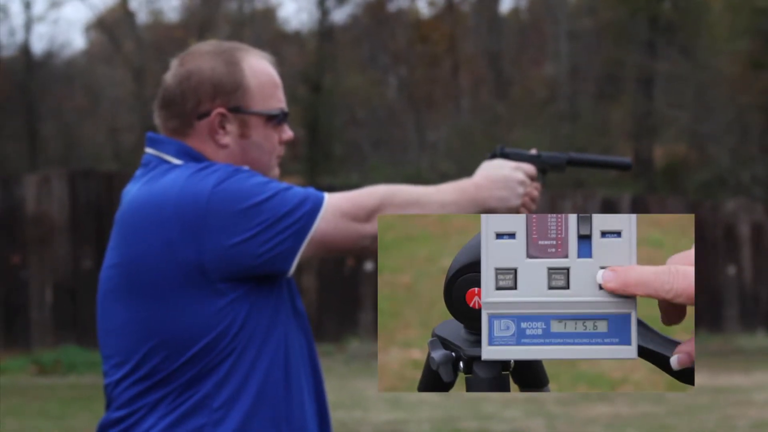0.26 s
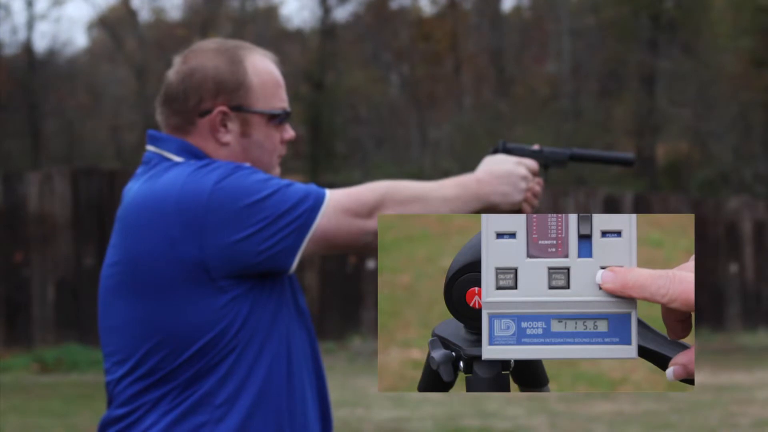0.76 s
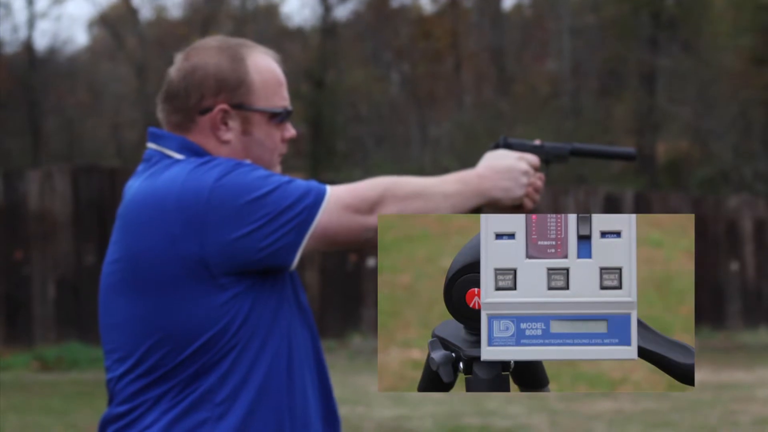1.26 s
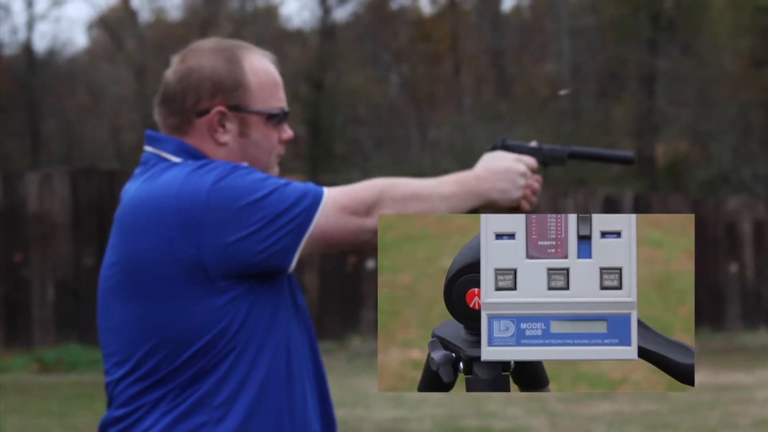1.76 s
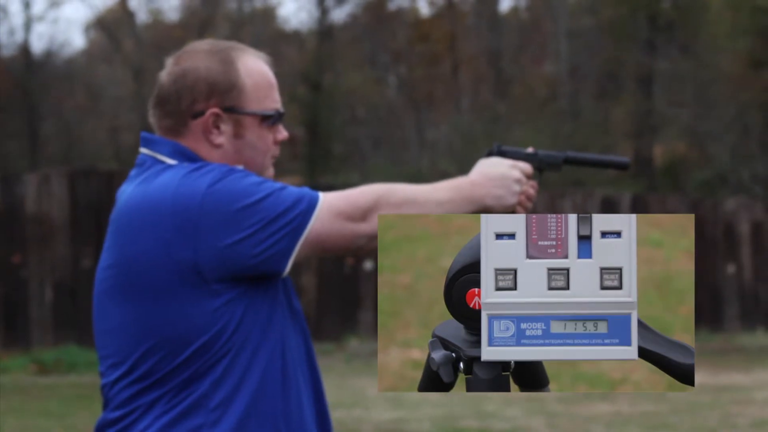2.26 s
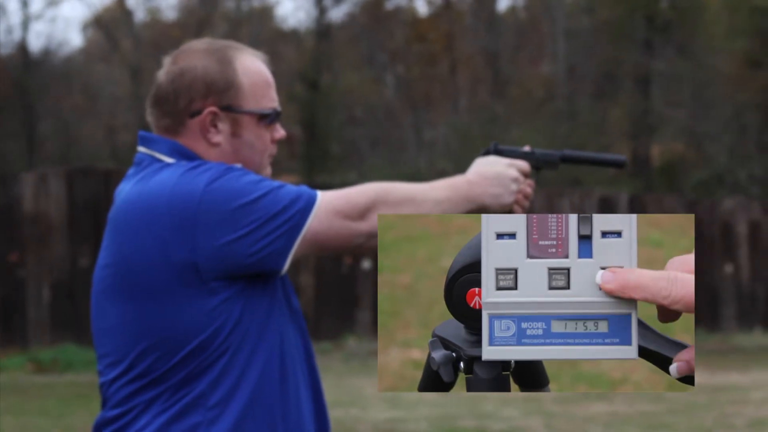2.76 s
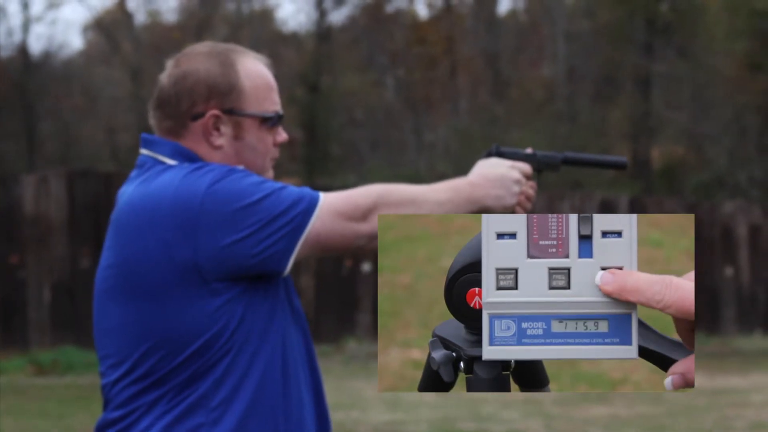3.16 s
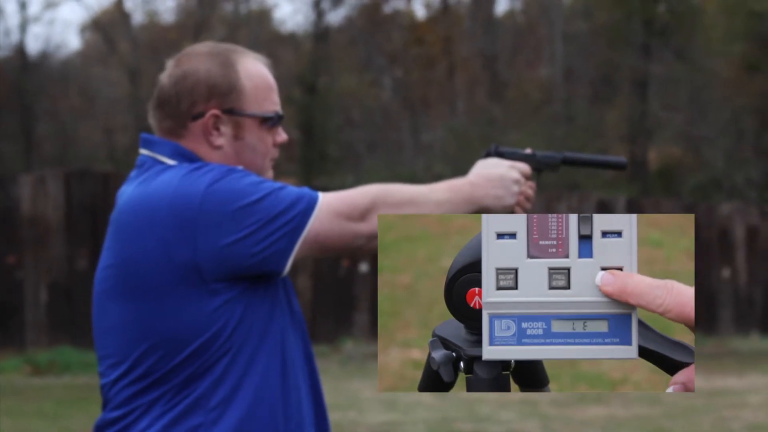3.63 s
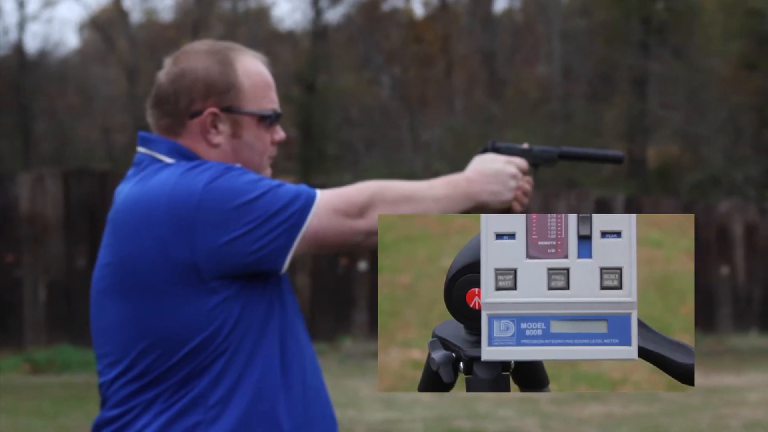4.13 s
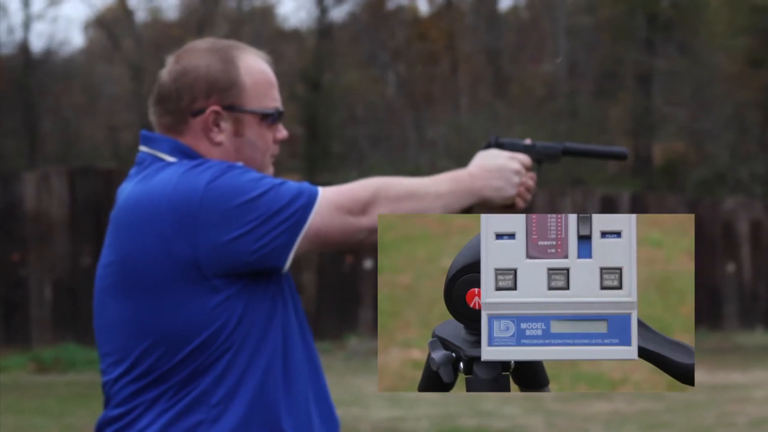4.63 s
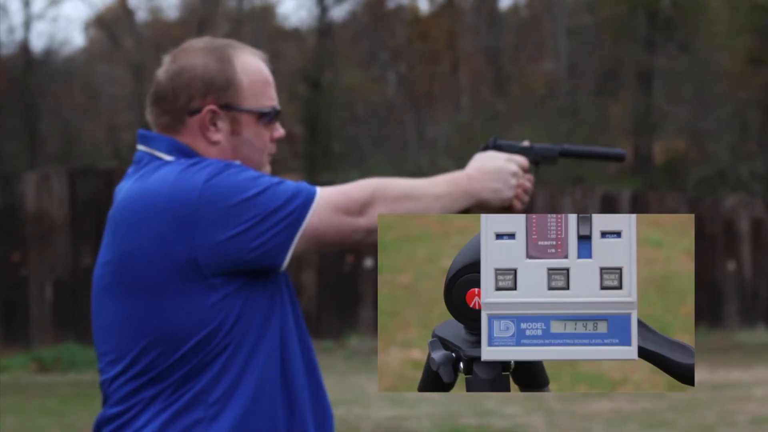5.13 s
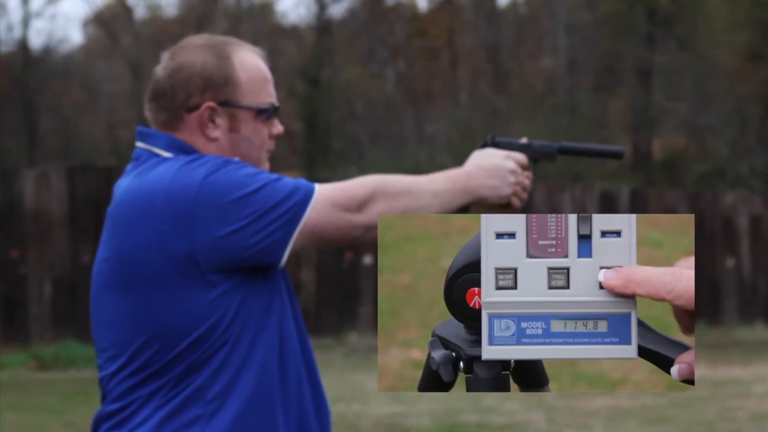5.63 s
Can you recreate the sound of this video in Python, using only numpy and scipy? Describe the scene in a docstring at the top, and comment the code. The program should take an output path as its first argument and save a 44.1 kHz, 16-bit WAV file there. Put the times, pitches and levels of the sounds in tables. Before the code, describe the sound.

Wind buffets a microphone outdoors as two suppressed pistol shots crack about three seconds apart, each with a bolt clack and woodland echoes.

```python
"""Suppressed pistol on an outdoor range

Two small-calibre shots, close enough to overload the microphone: hammer tick, spit of gas, slap of the bolt.
Delayed noise bursts are the echoes of fence and trunks and the bullet's thud; a diffuse tail is the woods.
A strength curve and listed gusts, with quick random lumps, drive the wind's rumble and flutter, over steady
hiss and a far sough. Trigger and meter button are short clicks; a far bird whistles a slightly wavering sine."""
import sys
import numpy as np
from scipy import signal
from scipy.fft import rfft, irfft
from scipy.io import wavfile
from scipy.ndimage import uniform_filter1d

SR = 44100
rng = np.random.default_rng(int(sys.argv[2]) if len(sys.argv) > 2 else 0)


def wrap_up_sound(samples):
    """Save the sound to the file named by the first command line argument, as 16-bit audio."""
    columns = np.atleast_2d(samples).T
    # keep every value between -1 and 1, then stretch to whole-number steps
    tamed = np.clip(columns, -1, 1)
    steps = np.round(tamed * 32767).astype(np.int16)
    wavfile.write(sys.argv[1], SR, steps)


N = 259749
TIME = np.arange(N) / SR
# Every *_COLOUR table is a relative noise spectrum: f/Hz, level per Hz/dB.


def amp(db):
    """Level: converts decibels to an amplitude ratio."""
    return 10 ** (np.asarray(db) / 20)


def evened(x):
    """Normalisation: scales a signal to rms 1."""
    return x / np.sqrt(np.mean(x ** 2) + 1e-20)


def read(points, hz):
    """Interpolation: reads a table linearly on a log-frequency axis."""
    f, value = np.transpose(points)
    return np.interp(np.log(hz + 1), np.log(f + 1), value)


def add(mix, s, sound):
    """Superposition: adds a sound to the mix at s seconds."""
    part = mix[round(s * SR):][:len(sound)]
    part += sound[:len(part)]


def smooth_noise(count, size):
    """Random modulation: white noise averaged twice over size steps, a smooth curve of rms 1."""
    once = uniform_filter1d(rng.standard_normal(count), size)
    return evened(uniform_filter1d(once, size))


def swell(at, width):
    """Gaussian envelope: a bell of height 1 around a moment."""
    return np.exp(-((TIME - at) / width) ** 2)


def noise(colour, size, tilt_db=0):
    """Spectral shaping: white noise filtered to a colour, tilted by dB per kHz, at rms 1."""
    hz = np.fft.rfftfreq(size, 1 / SR)
    gain = amp(read(colour, hz) + tilt_db * hz / 1000)
    return evened(irfft(rfft(rng.standard_normal(size)) * gain, size))


def steadied(x, size):
    """Envelope flattening: divides noise by its running rms over size samples."""
    return x / np.sqrt(uniform_filter1d(x ** 2, size) + 1e-12)


def burst(colour, decay, tilt_db=0, hold=0, rise=0):
    """Transient: coloured noise rises, holds, then decays exponentially; rise is a share of the decay."""
    t = np.arange(SR // 4) / SR
    onset = 1 - np.exp(-t / (0.00049 + rise * decay))
    fall = np.exp(-np.maximum(t - hold, 0) / decay)
    return steadied(noise(colour, size=len(t), tilt_db=tilt_db), size=200) * onset * fall


def snaps(rows, colour, hold, rise=0):
    """Superposition: plays a table of noise bursts that share one colour."""
    out = np.zeros(N)
    for s, db, tilt_db, decay in rows:
        add(out, s, amp(db) * burst(colour, decay, tilt_db, hold, rise))
    return out


def resonance(x, hz, width):
    """Resonance: a band-pass of the given width in Hz, with peak gain 1."""
    return signal.lfilter(*signal.iirpeak(hz, hz / width, SR), x)


# strength of the wind on the microphone: t/s, level/dB
WIND_STRENGTH = [(0.0, -16), (0.2, -7.5), (0.47, -8), (0.73, -15), (0.8, -24.5), (0.92, -9), (1.3, -11.5),
                 (1.58, -35.5), (1.84, -34), (1.92, -20.5), (2.4, -20.5), (3.0, -25.5), (3.45, -36.5),
                 (4.15, -34), (4.9, -13), (5.34, -22.5), (5.66, -18), (5.89, -28)]
# gusts that stand out of it: t/s, swell/dB, half-width/s
GUSTS = [(0.057, 5, 0.02), (0.17, 5.3, 0.019), (0.36, 3.5, 0.05), (0.7, 10, 0.033), (1.07, 3.5, 0.021),
         (1.225, 4, 0.019), (2.31, 6.1, 0.033), (2.93, 6, 0.028), (4.39, 8.5, 0.032), (4.616, 15, 0.017),
         (4.8, 4.5, 0.02)]
# deep and higher band of the wind noise: f/Hz, level per Hz/dB
RUMBLE_COLOUR = [(10, -14.5), (22, 6), (36, 2), (55, -3), (80, -6), (110, -19), (150, -28), (300, -84.5)]
FLUTTER_COLOUR = [(50, -40), (95, 0), (125, 0), (170, -8.5), (240, -18), (350, -29), (550, -44.5),
                  (1000, -64), (3000, -76)]
RUMBLE_DB, FLUTTER_DB = -2.5, -9.5  # levels at wind strength 0 dB
FLUTTER_GROWTH = 1.357  # dB of flutter per dB of wind strength
WIND_CEILING = 0.9  # largest amplitude of rumble and flutter together


def wind(lumps_db=2.5, rumble_lumps_db=1.56, flutter_lumps_db=2.0):
    """Turbulent pressure: eddies give a rumble and a flutter that grows faster with the wind; both saturate."""
    gusts_db = sum(db * swell(s, width) for s, db, width in GUSTS)
    strength_db = np.interp(TIME, *np.transpose(WIND_STRENGTH)) + gusts_db
    strength_db = strength_db + lumps_db * smooth_noise(N, size=1000)
    rumble_db = RUMBLE_DB + strength_db + rumble_lumps_db * smooth_noise(N, size=1800)
    flutter_lumps = np.tanh(smooth_noise(N, size=700))
    flutter_db = FLUTTER_DB + FLUTTER_GROWTH * strength_db + flutter_lumps_db * flutter_lumps
    rumble = amp(rumble_db) * steadied(noise(RUMBLE_COLOUR, size=N), size=5000)
    flutter = amp(flutter_db) * steadied(noise(FLUTTER_COLOUR, size=N), size=4000)
    push = WIND_CEILING * np.tanh((rumble + flutter) / WIND_CEILING)
    return push * signal.windows.tukey(N, 0.004)  # brief fade at both ends


# steady outdoor hiss: f/Hz, level per Hz/dB
AIR_COLOUR = [(60, 3.5), (200, -4), (400, 0), (580, -3.5), (800, -1), (1200, -5.5), (2200, -6.5),
              (3450, -8), (5200, -12), (6600, -19.5), (9000, -22.5), (15500, -25)]
AIR_DB = -48


def open_air():
    """Stationary noise: the outdoor hiss keeps one spectrum and level."""
    return amp(AIR_DB) * noise(AIR_COLOUR, size=N)


# sharp buffets of wind: t/s, level/dB, treble tilt/(dB per kHz), decay/s
BUFFETS = [(.155, -12, -0.5, 0.025), (.368, -14.5, 1.5, 0.013), (0.444, -14.5, -22, 0.017),
           (0.686, -10.5, -16, 0.015), (1.215, -17, -10, 0.0052)]
# their spectrum: f/Hz, level per Hz/dB
BUFFET_COLOUR = [(40, -0.5), (90, 0), (170, -3), (260, -11.5), (380, -32.5), (520, -32), (800, -38.5),
                 (1300, -44), (3000, -70), (8000, -90)]


def buffets():
    """Pressure transients: sharp buffets of wind are low bursts with a softened onset."""
    return snaps(BUFFETS, BUFFET_COLOUR, hold=0.0058, rise=0.33)


# the meter's reset button: t/s, level/dB, snap's treble tilt/(dB per kHz), knock's decay/s
BUTTON = [(.366, -25, 0.7, 0.00057), (3.0543, -28.5, 1, 0.0035), (5.8245, -31.5, 0.3, 0.0034)]
# its spectrum: f/Hz, level per Hz/dB
BUTTON_COLOUR = [(400, -8.5), (2200, -15), (2950, 3), (4100, -13.5), (6200, -13), (7800, -27), (10000, -16),
                 (13000, -14), (15000, -14), (16500, -22.5)]
BUTTON_SNAP_S, KNOCK_TILT_DB = 0.0013, -1.5  # snap's decay; knock's treble tilt per kHz


def button(snap_db=-1.0, knock_db=-2):
    """Impact: the button snaps over, and its plastic case knocks with its own decay."""
    out = np.zeros(N)
    for s, db, tilt_db, decay in BUTTON:
        snap = amp(snap_db) * burst(BUTTON_COLOUR, BUTTON_SNAP_S, tilt_db, hold=0.00066)
        knock = amp(knock_db) * burst(BUTTON_COLOUR, decay, KNOCK_TILT_DB, hold=0.0013)
        add(out, s, amp(db) * (snap + knock))
    return out


# faint hollow sough in the distance: f/Hz, level per Hz/dB
SOUGH_COLOUR = [(500, -45), (740, -8), (830, -9), (970, 5), (1100, -6), (1350, -11), (1900, -45),
                (4000, -64)]
SOUGH_AT_S, SOUGH_WIDTH_S, SOUGH_DB = 0.58, 0.29, -54.5  # peak, time to fall 9 dB either side, level


def sough():
    """Band-limited noise: a narrow far-off band swells and fades."""
    return amp(SOUGH_DB) * swell(SOUGH_AT_S, SOUGH_WIDTH_S) * noise(SOUGH_COLOUR, size=N)


# the bird's notes, each swelling and fading: t/s, half-width/s, level/dB
WHISTLE = [(.727, 0.024, -55), (.808, .028, -55), (.887, 0.024, -52.5), (.975, 0.058, -52.5)]


def bird(hz=2915, waver_hz=9):
    """Frequency modulation: three short notes and a longer one on one slightly wavering pitch."""
    level = sum(amp(db) * swell(s, width) for s, width, db in WHISTLE)
    waver = evened(uniform_filter1d(rng.standard_normal(N), size=800))
    phase = 2 * np.pi * np.cumsum(hz + waver_hz * waver) / SR
    return level * np.sqrt(2) * np.sin(phase)


# trigger taken up and let out: t/s, level/dB, treble tilt/(dB per kHz), decay/s, ring f/Hz
TRIGGER = [(1.5253, -30, 0.3, 0.0027, 5430), (2.6462, -26, 0.98, 0.0024, 5230),
           (4.2165, -41, -3, 0.0032, 2870), (5.386, -22.5, 0.95, 0.0026, 4700),
           (5.4868, -30, -2, 0.0016, 795)]
# its spectrum: f/Hz, level per Hz/dB
TRIGGER_COLOUR = [(300, 2.5), (1000, 2.5), (2200, 4.5), (3600, 3.5), (4900, 1.5), (6200, -6), (7800, -11),
                  (9200, -5.5), (12000, -8.5), (14200, -10), (16000, -13)]


def trigger():
    """Excited resonance: each small click leaves a short ring in the part that moved."""
    out = np.zeros(N)
    for s, db, tilt_db, decay, ring_hz in TRIGGER:
        click = burst(TRIGGER_COLOUR, decay, tilt_db, hold=0.00076)
        add(out, s, amp(db) * (click + 2.8 * resonance(click, ring_hz, width=500)))
    return out


# modes of the pistol's steel parts: f/Hz, relative level/dB, t60/s
STEEL_MODES = [(3300, -0.5, 0.11), (3030, -3.5, 0.16), (4530, -1, 0.055), (5235, -4.5, .1),
               (5380, -1.5, 0.1), (6700, -4, .1), (8850, -2, 0.19), (12000, -3, .14)]


def steel():
    """Modal ringing: the struck barrel, tube and bolt sound as decaying sines."""
    t = np.arange(SR // 4) / SR
    ring = np.zeros(len(t))
    for hz, db, t60 in STEEL_MODES:
        ring += amp(db - 60 * t / t60) * np.sin(2 * np.pi * (hz * t + rng.random()))
    return ring


def tube(hz=940, decay=0.01, low_hz=280, low_decay=0.0097, low_db=-4):
    """Air-column resonance: the suppressor tube rings briefly on a high note and a low one."""
    t = np.arange(SR // 4) / SR
    high = np.exp(-t / decay) * np.sin(2 * np.pi * hz * t)
    low = np.exp(-t / low_decay) * np.sin(2 * np.pi * low_hz * t)
    return high + amp(low_db) * low


def gas_push(hz, width):
    """Wave packet: the slug of gas leaving the tube is a hollow pop of a few cycles that peaks after 8 ms."""
    t = np.arange(SR // 30) / SR - 0.0084
    return -np.exp(-(t / width) ** 2) * np.cos(2 * np.pi * hz * t)


# answer of the woods: f/Hz, level per Hz/dB
WOODS_COLOUR = [(120, -6), (400, -14.5), (900, -5.5), (1450, -9.5), (2200, -6.5), (3400, -1), (5600, -2.5),
                (6600, -9), (9000, -7.5), (12500, -3.5), (16000, -17)]
# its reverberation time: f/Hz, t60/s
WOODS_T60 = [(200, 2.3), (1000, 1.51), (3300, 1.12), (5000, 0.97), (7000, 0.8), (10000, 0.53),
             (15000, 0.23)]


def woods(ring_hz, rise=0.012, lumpy_db=1.5, patchy_db=0.9):
    """Diffuse scattering: echoes of trunks and twigs in clumps of uneven colour; the treble dies first."""
    t = np.arange(3 * SR // 2) / SR
    spectrum = rfft(noise(WOODS_COLOUR, size=len(t)))
    ripple = amp(1.5 * smooth_noise(len(spectrum), size=150))
    lumps = amp(lumpy_db * smooth_noise(len(t), size=120))
    scatter = evened(irfft(spectrum * ripple, len(t)) * lumps)
    scatter = scatter + 0.45 * resonance(scatter, ring_hz, width=300)
    hz, age, z = signal.stft(scatter, SR, nperseg=256)
    clumps = uniform_filter1d(rng.standard_normal(z.shape), size=6, axis=0)  # across frequency
    clumps = evened(uniform_filter1d(clumps, size=4, axis=1))  # across time
    decay_db = -60 * age / read(WOODS_T60, hz)[:, None]
    tail = signal.istft(z * amp(patchy_db * clumps + decay_db), SR, nperseg=256)[1][:len(t)]
    # the edge of the wood answers all at once
    treeline = 1 + 0.43 * np.exp(-np.abs(t - 0.13) / 0.0162)
    return tail * treeline * (1 - np.exp(-t / rise))


# one row a shot: t/s, blast level/dB, gas pop f/Hz, gas pop level/dB, bolt delay/s, bolt level/dB,
# woods level/dB, strongest ring of the woods f/Hz, delay of the bullet's thud/s, thud level/dB
SHOTS = [(1.7488, 6, 386.7, 0, .0398, 0.5, -14.5, 3634, .2194, -15),
         (4.6261, 4, 417, -4.5, .0403, 0, -14.5, 3300, .2241, -14.5)]
# muzzle blast, and hammer or bolt: f/Hz, level per Hz/dB
BLAST_COLOUR = [(100, -17.5), (195, -17.5), (275, 2.5), (360, -12.5), (480, 0.5), (640, -20.5), (850, -1.5),
                (1400, -9), (1750, 0), (2300, -2.5), (3800, 0), (5800, 6), (6600, -6), (9500, -5),
                (12500, -1), (16000, -20)]
BOLT_COLOUR = [(150, -16), (600, -16), (950, 4.5), (1900, -7), (3100, 6.5), (4400, -1.5), (6000, 3.5),
               (6700, -16), (10000, -7.5), (12300, 0.5), (16000, -14)]


def pistol():
    """Source superposition: hammer, muzzle blast, gas pop and closing bolt, with the woods' answer."""
    out = np.zeros(N)
    for s, blast_db, pop_hz, pop_db, bolt_delay, bolt_db, woods_db, ring_hz, _, _ in SHOTS:
        hammer = amp(-17.0) * burst(BOLT_COLOUR, decay=0.0036)
        add(out, s - 0.0028, hammer)
        blast = burst(BLAST_COLOUR, decay=0.01, hold=0.0022)
        blast = blast + amp(-23.0) * steel() + amp(-11.0) * tube()
        add(out, s, amp(blast_db) * blast)
        add(out, s, amp(pop_db) * gas_push(hz=pop_hz, width=0.0021))
        bolt = burst(BOLT_COLOUR, decay=0.0017, hold=0.0023) + amp(-24) * steel()
        add(out, s + bolt_delay, amp(bolt_db) * bolt)
        add(out, s, amp(woods_db) * woods(ring_hz))
    return out


# fence, posts and trunks, alike for every shot: delay/s, level/dB, treble tilt/(dB per kHz), decay/s
REFLECTORS = [(0.0123, -3, 0, .0028), (0.0331, -0.5, 0.6, .0016), (0.0689, -1, -0.85, 0.0014),
              (0.071, -5.5, 2, 0.0015), (.0987, -5, -1.5, 0.002), (.1165, -9.5, 0.2, .0035),
              (.2, -16, 4, 0.0014)]
# ticks after the shots, and the bright crack of the second thud:
# t/s, level/dB, treble tilt/(dB per kHz), decay/s
TICKS_AND_CRACK = [(1.9888, -19, -2.5, 0.0079), (4.8067, -15.5, .8, 0.00056), (4.8502, -21, 0.5, 0.0022),
                   (4.8835, -17.5, -0.1, 0.0015)]
# echoes, ticks and crack, and the bullet in the backstop: f/Hz, level per Hz/dB
ECHO_COLOUR = [(150, -9), (550, -20), (880, 2), (1400, -6), (2100, -3.5), (2900, 3.5), (4500, 0.5),
               (6000, -6.5), (6800, -6), (12500, -14.5), (16000, -25.5)]
THUD_COLOUR = [(150, 2), (500, -5), (950, 2), (1400, -6.5), (2050, 4), (2600, -15), (4500, -17),
               (16000, -38)]
THUD_TILT_DB, THUD_DECAY_S = -1, 0.0037  # treble tilt per kHz; decay


def downrange():
    """Discrete reflection and impact: each shot has the same echo delays, and its bullet thuds home."""
    echoes = [(s + delay, db, tilt_db, decay)
              for s, *_ in SHOTS for delay, db, tilt_db, decay in REFLECTORS]
    thuds = [(s + delay, db, THUD_TILT_DB, THUD_DECAY_S) for s, *_, delay, db in SHOTS]
    returns = snaps(echoes + TICKS_AND_CRACK, ECHO_COLOUR, hold=0.001, rise=0.14)
    return returns + snaps(thuds, THUD_COLOUR, hold=0.0014, rise=0.34)


def scene():
    """Superposition: shots and echoes over small clicks, wind and open air."""
    shots = pistol() + downrange()
    clicks = trigger() + button()
    gusts = wind() + buffets()
    distance = bird() + sough() + open_air()
    return (shots + clicks + gusts + distance)[None]


def record(dry):
    """Overload and band-limiting: the input clips at full scale, then a low-pass removes the top."""
    clipped = np.clip(dry, -1, 1)
    lowpass = signal.firwin(255, 15900, window=("kaiser", 8), fs=SR)  # cutoff in Hz
    return signal.oaconvolve(clipped, lowpass[None], "same")


dry = scene()
out = record(dry)
wrap_up_sound(out)
```